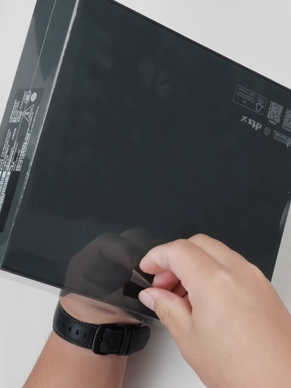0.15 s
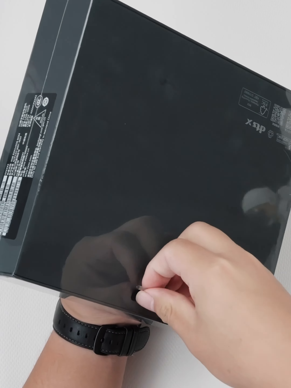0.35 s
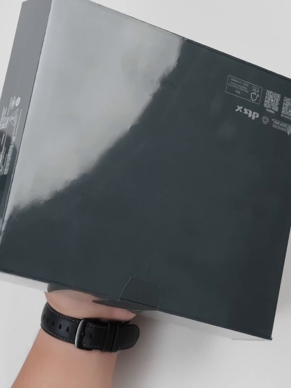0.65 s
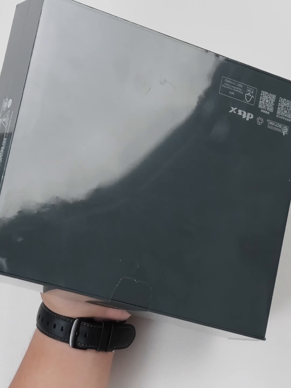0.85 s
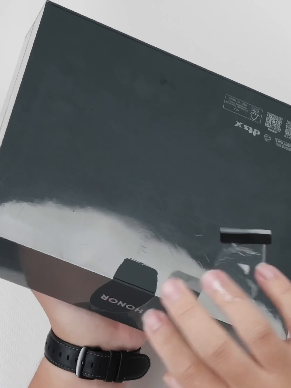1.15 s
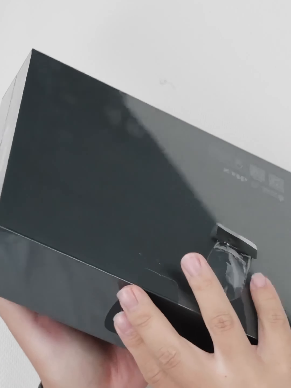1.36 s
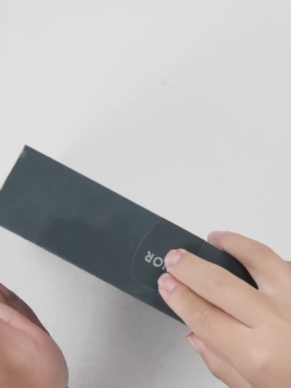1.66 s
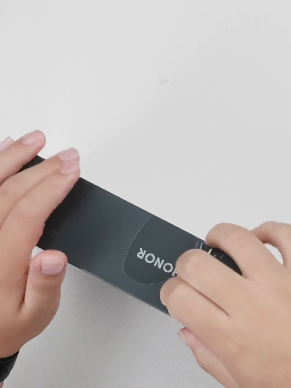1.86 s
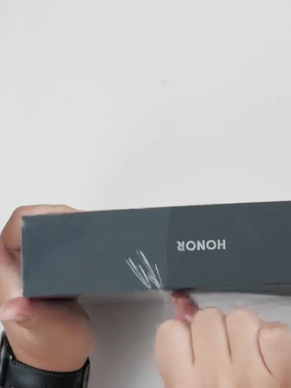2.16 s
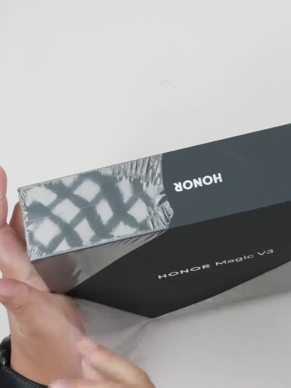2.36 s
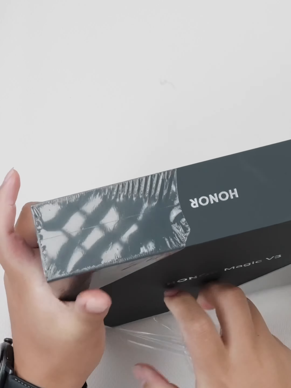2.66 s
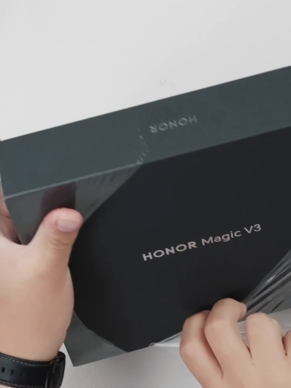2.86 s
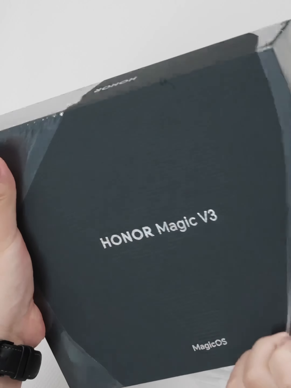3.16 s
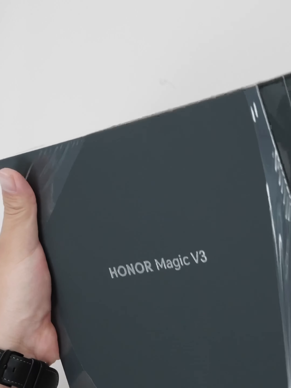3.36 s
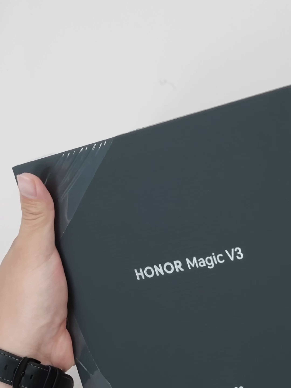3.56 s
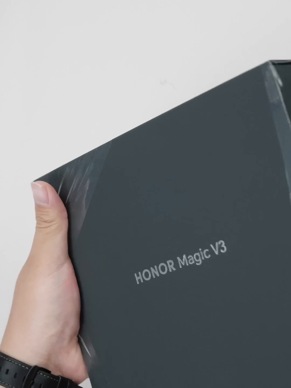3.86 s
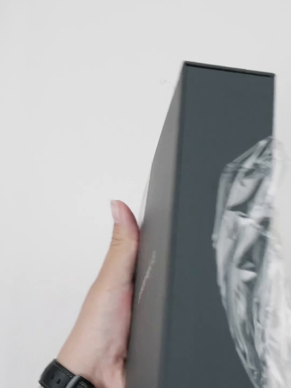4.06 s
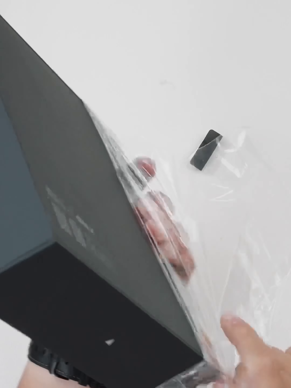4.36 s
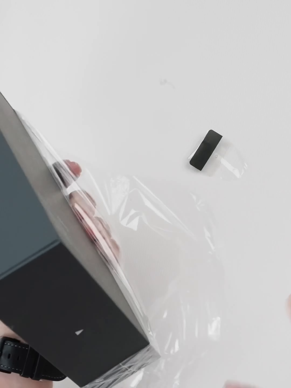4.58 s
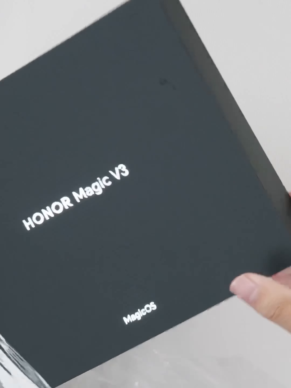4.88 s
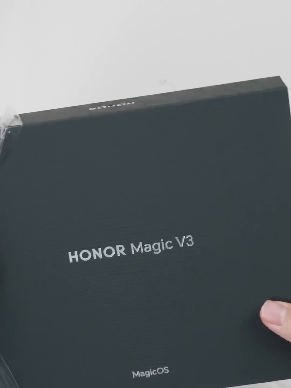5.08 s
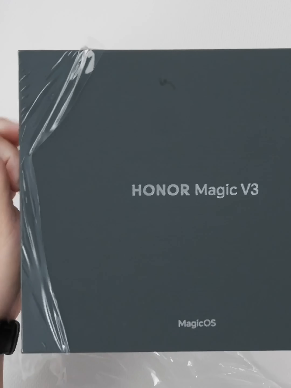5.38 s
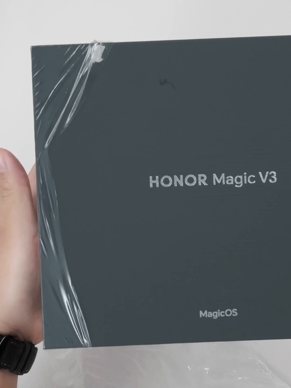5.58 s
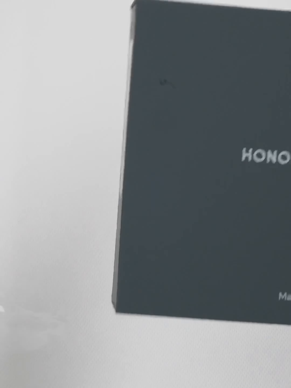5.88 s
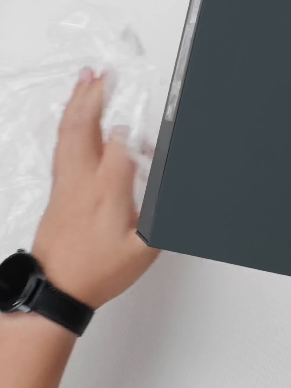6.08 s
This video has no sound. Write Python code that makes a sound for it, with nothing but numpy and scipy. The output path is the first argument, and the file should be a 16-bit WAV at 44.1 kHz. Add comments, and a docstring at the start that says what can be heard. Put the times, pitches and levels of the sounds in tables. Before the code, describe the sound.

Close to one microphone in a small bare room, hands strip crisp wrapping from a card box. After faint ticks the taut film cracks loudly. Box thuds and gliding scrapes lead into a low, buzzy rip, followed by loose crinkling, light knocks and soft squeaks. A bright cluster of snaps comes later, then gathered film rustles, fingers tap dully, and another strong snap fades into rustle over faint room noise.

```python
"""A small bare room: shrink film is torn off a stiff cardboard box over a table, close to one microphone.
The taut film bursts in sharp snaps and short rips: shaped noise bursts and slips that ring resonances.
It crinkles as it is gathered (pitched grains over hiss) and scrapes along the card (gliding resonances).
The box lands with thuds, fingers knock and film squeaks softly on it (damped modes) and its lid hums,
over reflections and low room noise."""
import sys
import numpy as np
from scipy import signal
from scipy.fft import rfft, irfft
from scipy.io import wavfile

SR = 44100
rng = np.random.default_rng(int(sys.argv[2]) if len(sys.argv) > 2 else 0)


def log_audio(samples):
    """Write samples as a 16-bit WAV file to the path given in sys.argv[1]."""
    # one column per channel
    frames = np.atleast_2d(samples).T
    # limit to full scale, then quantise
    limited = np.clip(frames, -1, 1)
    pcm = np.round(limited * 32767).astype(np.int16)
    wavfile.write(sys.argv[1], SR, pcm)


N = 274804
TIME = np.arange(N) / SR  # s

# the taut film snaps; a smaller freed patch rings higher; the two dull rows at 5.585 and 5.638 s
# are the contact clicks of finger knocks:
# [t/s, strength level/dB, patch f/Hz, box body below 900 Hz level/dB]
SNAPS_AND_CLICKS = [(0.1443, -20.5, 7100, 9.5), (0.28, -35, 8870, 18), (0.5457, -10, 4690, -10),
                    (0.556, -2, 5440, -5), (0.5568, -6.5, 7000, 1), (0.589, 11, 4700, 4.5),
                    (0.6, -22, 3000, 15), (0.61, -10, 8000, -9), (1.0326, -20.5, 5660, -10),
                    (1.8292, -15, 5970, 10.5), (1.8992, -6, 15000, 8), (2.121, -15.5, 2600, 5),
                    (2.2277, -4, 5200, 0), (2.351, -21, 5480, 1), (2.3624, -14, 3580, 9),
                    (2.3988, -1, 3030, 1.5), (2.506, -39, 2480, 3), (2.6856, -24.5, 8900, 5),
                    (2.697, -21.5, 4160, 8), (2.7177, -26, 6550, 15), (2.7493, -35, 5500, -1),
                    (2.9379, -6, 6260, 11.5), (3.001, -21.5, 4500, 17), (3.0298, -13, 2170, 1),
                    (3.106, -31, 1900, 0), (3.202, -20, 3600, -8), (3.269, -26, 5030, 7),
                    (3.3478, -26, 11300, 8), (3.447, -13.5, 4220, 12), (3.4964, -25, 5600, 3),
                    (3.547, -22.5, 6900, 13.5), (3.6484, -19, 3500, -7), (3.7215, 2, 2170, -3.5),
                    (3.8492, -13.5, 2000, 1), (3.921, -21, 4200, 1), (3.9831, -10.5, 10700, -4),
                    (4.021, -14, 4600, -29), (4.032, -4, 4020, -5), (4.036, 2.5, 13800, -3),
                    (4.0545, 3, 11000, -13), (4.059, 6, 12500, 4), (4.0786, -1, 13400, -3),
                    (4.084, -3.5, 13500, 10), (4.2858, -24, 5000, 7), (4.3712, -19, 7000, 6),
                    (4.386, -7, 5130, -11), (4.9837, -26, 13000, 12), (5.168, -24.5, 4300, -5),
                    (5.203, -22.5, 7040, -24), (5.254, -25, 5400, 11), (5.337, -25, 2520, 10),
                    (5.3444, -13, 2200, 6.5), (5.495, -21, 3820, 6), (5.528, -13.5, 3300, 5.5),
                    (5.534, -16.5, 4600, 5), (5.585, -15.5, 1300, 14), (5.638, -26, 1400, 7),
                    (5.724, -7.5, 5900, 11.5), (5.7273, -4.5, 6400, 5), (5.7363, 11, 2280, -2),
                    (5.748, -1, 3020, 5), (5.762, -9, 6000, 0), (5.863, -15, 6100, -28),
                    (6.0565, -20, 4400, -18), (6.1163, -22, 2730, -21)]
# colour that all snaps and clicks share: [f/Hz, level/dB]
SNAP_SPECTRUM = [(100, -24), (450, -1.5), (900, -3.5), (1800, -0.57), (3000, -3), (5000, -4), (7000, -3),
                 (10500, -2.8), (16000, -2)]
CRACK_S, FLUTTER_S = .0007, .005  # decay times


def snaps(release_db=3, flutter_db=-14, steepness=2.47, ring_db=5, ring_octaves=1.0, level_db=0):
    """Each snap is a sudden release of tension, a short crack and a flutter of film; two are knock clicks."""
    out, t = np.zeros(N), np.arange(2048) / SR
    hz = np.geomspace(100, 16000, 40)
    low = np.interp(hz, [900, 1800], [1, 0])
    for s, db, patch_hz, body_db in SNAPS_AND_CLICKS:
        dying = np.exp(-t / CRACK_S) + amp(flutter_db) * np.exp(-t / FLUTTER_S)
        # the stronger the snap, the more a clean pulse leads it
        pulse = amp(release_db + db) * (t == 0)
        burst = rng.standard_normal(len(t)) * dying - pulse
        # the patch rings broadly at its pitch and radiates less above it
        patch = ring_db * np.exp(-(np.log2(hz / patch_hz) / ring_octaves) ** 2)
        patch -= 10 * np.log10(1 + (hz / patch_hz) ** steepness)
        shape = read(SNAP_SPECTRUM, hz) + body_db * low + patch
        snap = colour(disperse(burst), np.column_stack([hz, shape]))
        add(out, s, amp(db + level_db) * snap)
    return out


# the film tears in short runs: [t/s, length t/s, box panel level/dB, panel f/Hz,
# taut film level/dB, film f/Hz, torn edge level/dB]
TEARS = [(0.553, 0.0056, -44, 880, -38, 1910, -34.5), (0.566, 0.013, -39, 774, -46, 1820, -55),
         (0.588, 0.033, -51, 520, -52, 1500, -38.5), (2.134, 0.0087, -42, 553, -48, 1670, -63),
         (2.1515, 0.026, -34.5, 513, -42, 1780, -68), (2.192, 0.024, -35.5, 510, -43, 1580, -74),
         (2.219, 0.019, -31.5, 610, -40.5, 1500, -65), (3.72, 0.0046, -45, 980, -59, 1740, -43),
         (5.724, 0.0021, -42, 660, -44, 1560, -46), (5.725, 0.0058, -36, 706, -54, 1850, -40),
         (5.731, 0.019, -50, 580, -58, 1800, -46)]
# resonances of the taut film: [multiple of its pitch, width f/Hz, level/dB]
TAUT_MODES = [(.66, 500, 1.5), (1, 383, 9.5), (1.36, 528, 6.5), (1.999, 600, -6), (2.7, 676, -17.5)]


def rips(slips_per_s=420, uneven=.45, spread_db=3.5, release_s=0.0097, panel_width_hz=300,
         edge_hz=7500, edge_width_hz=900, fold_hz=4750, fold_db=-7, tighten_octaves_per_s=0.91, count=120):
    """A tear runs in quick uneven slips; each rings the box panel, the taut film and its thin torn edge."""
    out, t = np.zeros(N), np.arange(4096) / SR
    tension = 2 ** (tighten_octaves_per_s * t)  # bends every pitch upwards
    for s, length_s, panel_db, panel_hz, film_db, film_hz, edge_db in TEARS:
        gaps, sizes = rng.standard_normal((2, count))
        at = np.cumsum(np.exp(uneven * gaps)) / slips_per_s
        strengths = amp(spread_db * sizes) * rng.choice([-1, 1], count)
        slips = np.zeros(len(t))
        for slip_s, strength in zip(at - at[0], strengths):
            add(slips, slip_s, [strength])
        slips *= np.exp(-np.maximum(t - length_s, 0) / release_s)
        panel = resonate(slips, panel_hz * tension, panel_width_hz)
        film = sum(amp(db) * resonate(slips, film_hz * ratio * tension, width)
                   for ratio, width, db in TAUT_MODES)
        edge = resonate(slips, edge_hz * tension, edge_width_hz)
        edge += amp(fold_db) * resonate(slips, fold_hz * tension, edge_width_hz / 2)
        tear = amp(panel_db) * unit(panel) + amp(film_db) * unit(film) + amp(edge_db) * unit(edge)
        # a shorter tear carries less energy
        add(out, s, np.sqrt(length_s / t[-1]) * tear)
    return out


# colour of the crinkling film: [f/Hz, level/dB]
CRINKLE_SPECTRUM = [(150, -12.5), (400, 4.5), (900, 2.5), (1800, 5.5), (3200, 2), (5000, -1), (8000, -1.5),
                    (11000, -6.5), (16000, -9.5)]
CREASES_PER_S, CREASE_SPREAD_DB = 2200, 3  # tiny creases that flip, and the spread of their sizes


def crinkle(cycles=0.94, level_db=-1, top_hz=9500, count=24):
    """Many tiny creases flip in clumps, each with its own pitch, over the soft hiss of film on film."""
    grains, t = np.zeros(N), np.arange(256) / SR
    for hz in np.linspace(600, 15500, count):
        flips = rng.random(N) < CREASES_PER_S / count / SR
        size = amp(CREASE_SPREAD_DB * np.minimum(rng.exponential(1, N), 4)) * flips
        crease = np.exp(-t * np.sqrt(hz * 4000) / cycles) * np.sin(2 * np.pi * hz * t)
        crease /= np.linalg.norm(crease)
        grains += signal.oaconvolve(size * rng.choice([-1, 1], N), crease)[:N]
    clumps = unit(grains) * catching(rate_hz=110, depth_db=3)
    crackle = unit(unit(colour(clumps, CRINKLE_SPECTRUM)) + ticks())
    hiss = unit(colour(rng.standard_normal(N), CRINKLE_SPECTRUM))
    # the treble follows the hand with its own crispness
    treble = 1 / (1 + (top_hz / (np.fft.rfftfreq(N, 1 / SR) + 1)) ** 8)
    out = np.zeros(N)
    for sound, crackling in (crackle, True), (hiss, False):
        top = irfft(rfft(sound) * treble, N)
        out += (sound - top) * handling(False, crackling) + top * handling(True, crackling)
    return amp(level_db) * out


def ticks(per_s=100, spread_db=4, tick_s=0.0018, level_db=-6.5, count=6):
    """Larger folds flip with ticks of their own, each size of fold in its own register."""
    out = np.zeros(N)
    for hz in np.geomspace(1500, 12000, count):
        size = amp(spread_db * np.minimum(rng.exponential(1, N), 2))
        flips = size * (rng.random(N) < per_s / count / SR)
        dying = signal.lfilter([1], [1, -np.exp(-1 / (tick_s * SR))], flips)
        out += resonate(dying * rng.standard_normal(N), np.full(N, hz), hz)
    return amp(level_db) * unit(colour(out, CRINKLE_SPECTRUM))


def catching(rate_hz, depth_db):
    """Film catches and lets go unevenly: a random gain of rms 1."""
    wander = unit(lowpass(rng.standard_normal(N), rate_hz))
    return unit(amp(depth_db * np.clip(wander, -2, 2)))


# the hand pulls or gathers the film, which crinkles and settles: [tightest t/s, level/dB, rise t/s,
# fall t/s, crispness of the treble level/dB, crackle over hiss level/dB]
HAND_PULLS = [(0, -60.5, 0.0092, 0.13, 4, -12), (.585, -41, 0.044, 0.2, 1, -5),
              (1.021, -66, 0.15, 0.098, -1, -1), (1.351, -65, 0.069, 0.17, -7, 2),
              (1.7, -59.5, 0.1, 0.87, -11, 3.5), (2.26, -45.5, 0.11, 0.48, -3, 10),
              (2.38, -46, 0.066, 0.042, 2, 6), (2.57, -55.5, 0.042, 0.16, 8, 4),
              (2.76, -72, 0.075, 0.19, -7, 23), (3.022, -50.5, 0.053, 0.089, 5.5, 12),
              (3.2, -52, 0.089, 0.12, 2, 4), (4.07, -41.5, 0.058, 0.18, -3, 0),
              (4.311, -46.5, 0.13, 0.23, 2.5, 9), (4.385, -40.5, 0.042, 0.1, 4.5, 1.5),
              (4.5, -50.5, 0.12, 0.13, 3, -1), (4.88, -54.5, 0.14, 0.27, -3, -4),
              (5.22, -54, 0.025, 0.18, 4, 12), (5.335, -51.5, 0.027, .04, 1, 2),
              (5.73, -46.5, 0.096, 0.19, 3, 6), (5.86, -51.5, 0.055, 0.25, 1, -11)]
# the film rustles by itself once it hangs loose: [t/s, level/dB]
LOOSE_RUSTLE = [(0, -78), (2.08, -80), (2.2, -60.5), (3.33, -63.5), (3.55, -58), (4.5, -60.5), (5.42, -62),
                (5.55, -55), (6.23, -64)]


def handling(crisp, crackling, loose_crackle_db=5):
    """Level curve of the pulls over the loose rustle, for treble or the rest, for crackle or hiss."""
    def share(crackle_db):
        """Decibels of the whole that go to the crackle, or else to the hiss."""
        return -10 * np.log10(1 + amp(-crackle_db if crackling else crackle_db) ** 2)
    pulls = [(s, db + crisp * crisp_db + share(crackle_db), rise_s, fall_s)
             for s, db, rise_s, fall_s, crisp_db, crackle_db in HAND_PULLS]
    loose_db = np.interp(TIME, *np.transpose(LOOSE_RUSTLE)) + share(loose_crackle_db)
    return np.hypot(swells(pulls), amp(loose_db))


# film or skin slides along the card:
# [fastest t/s, level/dB, rise t/s, fall t/s, pitch f/Hz, glide in octaves per s]
CARD_SLIDES = [(.58, -39.5, 0.019, 0.14, 1300, -6), (1.33, -59.5, 0.096, 0.1, 390, 5),
               (1.67, -51, 0.047, 0.13, 259, 2), (1.72, -54.5, 0.068, 0.34, 1800, 2.5),
               (1.876, -54, 0.086, 0.17, 2560, 1.5), (2.166, -43, 0.023, .12, 1500, -8),
               (2.2, -36.5, 0.056, .05, 335, -7), (2.25, -42.5, 0.05, 0.37, 606, 0.57),
               (2.56, -59, 0.036, 0.14, 560, 9), (2.859, -57, 0.086, 0.099, 1500, 4),
               (3.13, -45.5, 0.023, 0.074, 1530, 6), (3.16, -48.5, 0.035, 0.02, 2790, 9),
               (4.1, -45, .05, 0.058, 263, 1), (5.02, -48.5, 0.061, 0.11, 970, -10),
               (5.028, -57, 0.12, 0.14, 2070, -3.5), (5.067, -50, 0.027, 0.033, 1410, 8),
               (5.08, -49, 0.023, 0.012, 2800, 2), (5.206, -50, 0.011, 0.1, 1970, -4),
               (5.26, -51.5, 0.049, 0.082, 370, 4), (5.71, -51, 0.094, 0.059, 636, -5)]
# resonances of the sliding sheet: [multiple of its pitch, width as a share of the pitch, level/dB]
SHEET_MODES = [(0.581, 0.3, -2), (1.001, 0.71, 18.5), (1.7, .8, 1), (2.8, 0.75, -4.5), (4.3, 0.99, -18.5)]


def slides(slips_per_s=700, hiss=0.13, grit_db=-5, grit_db_per_octave=4, grit_hz=1000, grit_reach=1.41):
    """Uneven slips ring the sheet, whose pitch glides as it tightens or slackens; high rubs are grittier."""
    out = np.zeros(N)
    for peak_s, db, rise_s, fall_s, pitch_hz, glide in CARD_SLIDES:
        t = np.arange(peak_s - 2 * rise_s, peak_s + 2 * fall_s, 1 / SR)
        noise = rng.standard_normal(N)[:len(t)]
        slips = noise * (hiss + (rng.random(N)[:len(t)] < slips_per_s / SR))
        hz = pitch_hz * 2 ** np.clip(glide * (t - peak_s), -1, 1)
        sheet = sum(amp(mode_db) * resonate(slips, hz * ratio, pitch_hz * width)
                    for ratio, width, mode_db in SHEET_MODES)
        dull_hz = grit_reach * pitch_hz
        grit = unit(lowpass(lowpass(slips, dull_hz), dull_hz))
        grit = amp(grit_db + grit_db_per_octave * np.log2(pitch_hz / grit_hz)) * grit
        add(out, t[0], unit(unit(sheet) + grit) * swell(t, peak_s, db, rise_s, fall_s))
    return out


# the loosened sleeve of film slips along the box: [fastest t/s, level/dB, rise t/s, fall t/s]
SLEEVE_SLIPS = [(3.8, -70, 0.31, .3), (4.87, -66, 0.43, 0.61), (5.65, -61, 0.16, .7)]


def sleeve(hz=8200, width_hz=3200):
    """Smooth film slips over the smooth card with a thin, even hiss."""
    return unit(resonate(rng.standard_normal(N), np.full(N, hz), width_hz)) * swells(SLEEVE_SLIPS)


# the whole box bumps the table and chatters to rest: [t/s, strength level/dB, dull above f/Hz]
TABLE_BUMPS = [(0.593, -22.5, 164), (1.7553, -8.5, 1020), (1.7654, -22.5, 900), (1.7872, -34, 700),
               (1.797, -29, 300), (1.8105, -23.5, 420), (1.8243, -30, 500), (2.2604, -11, 173),
               (2.269, -23, 200), (2.377, -20.5, 174), (4.06, -30, 200), (4.825, -28.5, 142)]
# modes of the box on the table: [f/Hz, level/dB, time to fall 60 dB t/s]
BOX_MODES = [(148, -23.5, 0.15), (185, -7, 0.022), (241, -21.5, 0.049), (312.6, -3, 0.051), (484, -21, 0.1),
             (599, -30, 0.25), (680, -9, 0.039), (1133, -22, 0.031)]


def thuds(push_s=0.0002, push_db=0, rattle_db=-20, rattle_t60=0.53, rattle_hz=800, lowest_hz=115, sub_db=-13):
    """A heavy push rings box and table; the table top rattles on briefly."""
    out, t = np.zeros(N), np.arange(SR) / SR
    modes = sum(amp(db - 60 * t / t60) * np.sin(2 * np.pi * hz * t) for hz, db, t60 in BOX_MODES)
    push = amp(push_db) * (t / push_s) * np.exp(1 - t / push_s)
    # a small box radiates little bass
    small_box = [(30, sub_db), (lowest_hz / 2, sub_db), (lowest_hz * 1.8, 0), (16000, 0)]
    for s, db, dull_hz in TABLE_BUMPS:
        rattle = unit(lowpass(rng.standard_normal(len(t)), rattle_hz))
        rattle = rattle * amp(rattle_db - 60 * t / rattle_t60)
        radiated = colour(modes + push + rattle, small_box)
        add(out, s, amp(db) * lowpass(radiated, dull_hz))
    return out


# fingers knock on the box and film squeaks softly against it (near 3.65 and 3.81 s):
# [t/s, level/dB, panel or squeak f/Hz, hardness of the contact level/dB]
KNOCKS_AND_SQUEAKS = [(2.091, -47.5, 1620, 4), (2.2005, -32, 1210, -14), (2.23, -27.5, 660, -8),
                      (2.938, -30, 680, -13), (3.106, -38.5, 314, 2), (3.4436, -29.5, 490, -14.5),
                      (3.646, -22.5, 465, -19.5), (3.8057, -23, 538, -19), (3.847, -32, 500, -10),
                      (4.823, -31, 320, -2), (4.836, -46, 736, 6), (5.254, -40, 363, -3),
                      (5.293, -44.5, 520, 6.5), (5.345, -34, 222, 0.5), (5.394, -28, 350, -14),
                      (5.443, -43.5, 1330, 1), (5.583, -26, 223, -3.5), (5.594, -33.5, 384, 2),
                      (5.638, -30.5, 224, -3), (5.7344, -17.5, 635, -10.5)]
# colour of a fingertip tapping card: [f/Hz, level/dB]
TAP_SPECTRUM = [(60, -18), (180, 8), (500, 4), (800, -2.5), (1500, -1), (2400, -15), (5000, -19),
                (16000, -39)]


def knocks(ring_s=0.0043, press_s=0.00036, overtone=2.47, overtone_db=-8, rim_hz=720, rim_db=-9,
           tap_db=25, tap_s=0.0022, top_hz=2600, lowest_hz=130):
    """A damped panel and the stiff rim ring for a few cycles with the tap; soft onsets make film squeaks."""
    out, t = np.zeros(N), np.arange(4096) / SR
    for s, db, hz, hard_db in KNOCKS_AND_SQUEAKS:
        modes = [(hz, 1), (hz * overtone, amp(overtone_db)), (rim_hz, amp(rim_db))]
        panel = sum(gain * np.exp(-t / ring_s * np.sqrt(f / hz)) * np.sin(2 * np.pi * f * t)
                    for f, gain in modes)
        # a soft contact presses in more slowly
        panel = panel * (1 - np.exp(-t * amp(hard_db) / press_s))
        burst = rng.standard_normal(len(t)) * np.exp(-t / tap_s)
        tap = colour(disperse(burst), TAP_SPECTRUM)
        add(out, s, amp(db) * (panel + amp(tap_db + hard_db) * tap))
    return signal.lfilter(*signal.butter(2, [lowest_hz, top_hz], "band", fs=SR), out)


# the broad lid is flexed and hums:
# [loudest t/s, level/dB, rise t/s, fall t/s, rumble beside the hum level/dB]
LID_FLEXES = [(1.841, -45, 0.05, 0.35, -5), (2.32, -38.5, 0.047, 0.28, -4), (5.94, -57.5, 0.28, 0.47, -23)]


def lid(hz=149, rumble_hz=155, width_hz=110):
    """The lowest mode of the lid hums; when the box is jostled, a loose rumble surrounds it."""
    hum = unit(np.sin(2 * np.pi * hz * TIME)) * swells([row[:-1] for row in LID_FLEXES])
    rumble = unit(resonate(rng.standard_normal(N), np.full(N, rumble_hz), width_hz))
    rumble_rows = [(s, db + rumble_db, rise_s, fall_s) for s, db, rise_s, fall_s, rumble_db in LID_FLEXES]
    return hum + rumble * swells(rumble_rows)


# the box is swung round in the hands: [fastest t/s, level/dB, rise t/s, fall t/s]
BOX_SWINGS = [(.72, -56, 0.12, .45), (1.81, -50.5, 0.06, 0.39), (2.62, -59.5, 0.3, 1.6)]


def sway(top_hz=60, lowest_hz=22):
    """The broad box pushes air at the microphone: a faint rumble."""
    rumble = signal.lfilter(*signal.butter(2, [lowest_hz, top_hz], "band", fs=SR), rng.standard_normal(N))
    return unit(rumble) * swells(BOX_SWINGS)


# a faint high ring dies away at the start: [f/Hz, starting rms level/dB, time to fall 60 dB t/s]
HIGH_RING = [(5100, -68, 1), (5900, -61, 0.18), (6900, -64.5, 0.75), (8360, -78, 0.53), (11060, -64, 0.36)]


def ring(width_hz=750):
    """Narrow bands of treble noise fade out."""
    t = np.arange(SR) / SR
    out = np.zeros(N)
    for hz, db, t60 in HIGH_RING:
        band = unit(resonate(rng.standard_normal(SR), np.full(SR, hz), width_hz))
        add(out, 0, band * amp(db - 60 * t / t60))
    return out


# standing waves of the room: [f/Hz, level/dB, time to fall 60 dB t/s]
STANDING_WAVES = [(156, -70.5, 0.41), (257, -70.5, .8), (317, -61, 0.25), (600, -56.5, 0.24)]
MOVE_S = .09  # time from one set of reflections to the next


def room(x, wet_db, early_db, count=5):
    """Sets of reflections crossfade in a cycle, as for a box that keeps moving; the standing waves stay."""
    t = np.arange(SR) / SR
    standing = sum(amp(db - 60 * t / t60) * np.cos(2 * np.pi * f * t) for f, db, t60 in STANDING_WAVES)
    out = x + signal.fftconvolve(x, standing)[:N]
    for k in range(count):
        # each position swells and fades over two moves, then waits its turn
        near = np.sin(np.pi / 2 * np.minimum((TIME / MOVE_S - k) % count, 2))
        out += signal.fftconvolve(x * near, reflections(wet_db, early_db))[:N]
    return out


# decay of the room: [f/Hz, time to fall 60 dB t/s]
TAIL_T60 = [(100, 1), (300, 0.42), (1000, 0.5), (3000, 0.5), (8500, 0.42), (11000, 0.27), (16000, 0.33)]
# colour of the room's tail: [f/Hz, level/dB]
TAIL_SPECTRUM = [(100, -6), (180, 3.5), (320, 9), (600, -2.5), (1000, 1.5), (3000, -0.5), (5000, 2),
                 (8200, 2.5), (11000, 3.5), (16000, -12)]


def reflections(wet_db, early_db, early_s=0.0044, build_s=0.0021):
    """Quick reflections from table and box, then the tail of the bare walls, for one position of the box."""
    t = np.arange(SR) / SR
    taps = rng.standard_normal(SR) * (rng.random(SR) < 6000 / SR)
    hz, frame_s, z = signal.stft(taps, SR, nperseg=256)
    z = z * amp(read(TAIL_SPECTRUM, hz)[:, None] - 60 * frame_s / read(TAIL_T60, hz)[:, None])
    tail = signal.istft(z, SR, nperseg=256)[1][:SR] * (1 - np.exp(-t / build_s))
    early = rng.standard_normal(SR) * (rng.random(SR) < 5000 / SR)
    early = early * np.exp(-t / early_s) * (t > .001)
    return amp(wet_db) * tail / np.linalg.norm(tail) + amp(early_db) * disperse(early)


# still air of the room: [f/Hz, relative level/dB]
AIR_SPECTRUM = [(20, 1.5), (35, 0.5), (60, -2), (130, -3.5), (250, -2), (450, -7), (650, -10), (1100, -10),
                (1800, -20.5), (4000, -32.5), (9000, -39), (16000, -43)]


def air(level_db=-60):
    """Steady low room noise: white noise shaped to the spectrum of the still air."""
    gain = amp(read(AIR_SPECTRUM, np.fft.rfftfreq(N, 1 / SR)))
    return amp(level_db) * unit(irfft(rfft(rng.standard_normal(N)) * gain, N))


def swell(t, peak_s, db, rise_s, fall_s):
    """One movement of the hand: it gathers 20 dB over its rise and loses 20 dB over each fall time."""
    before, after = np.maximum(peak_s - t, 0), np.maximum(t - peak_s, 0)
    return amp(db - 20 * np.minimum((before / rise_s) ** 2 + after / fall_s, 10))


def swells(rows):
    """The joint level of several movements, summed as power."""
    return np.sqrt(sum(swell(TIME, *row) ** 2 for row in rows))


def disperse(x, evenness=0.65):
    """Keeps the rough timing of a burst but evens its spectrum; energy 1."""
    z = rfft(x, 2 * len(x))
    even = irfft(z / (abs(z) + 1e-12) ** min(evenness, 1))[:len(x)]
    return even / np.linalg.norm(even)


def resonate(x, hz, width_hz):
    """A resonance that follows the curve hz: shift down to 0 Hz, smooth, shift back up."""
    turn = np.exp(2j * np.pi * np.cumsum(hz) / SR)
    r = np.exp(-np.pi * width_hz / SR)
    return 2 * (turn * signal.lfilter([(1 - r) ** 2], [1, -2 * r, r * r], x / turn)).real


def colour(x, points, size=2048):
    """Causal minimum-phase filter with the given spectrum, so that attacks stay sharp."""
    log_gain = np.log(amp(read(points, abs(np.fft.fftfreq(size, 1 / SR)))))
    taps = np.fft.ifft(np.exp(np.conj(signal.hilbert(log_gain)))).real
    return signal.oaconvolve(x, taps)[:len(x)]


def lowpass(x, hz):
    """Second-order low-pass."""
    return signal.lfilter(*signal.butter(2, min(hz, SR / 3), fs=SR), x)


def read(points, hz):
    """Reads a spectrum on a log-frequency axis."""
    f, value = np.transpose(points)
    return np.interp(np.log(hz + 1), np.log(f + 1), value)


def amp(db):
    """Decibels to gain."""
    return 10 ** (np.asarray(db) / 20)


def unit(x):
    """Scales to rms 1."""
    return x / np.sqrt(np.mean(x ** 2) + 1e-20)


def add(mix, s, sound):
    """Mixes a sound in at time s."""
    part = mix[max(round(s * SR), 0):][:len(sound)]
    part += sound[:len(part)]


def scene():
    """Film and box sound in the same room; the box, close to the microphone, is drier."""
    film = room(snaps() + rips() + crinkle(), wet_db=-9.5, early_db=-6.0)
    box = room(knocks() + thuds() + slides(), wet_db=-10.5, early_db=-10.0)
    return (film + box + sleeve() + lid() + ring() + sway() + air())[None]


def record(dry, edge_hz=16200):
    """The recorder clips peaks hard, then cuts the treble above its band edge."""
    clipped = np.clip(dry, -.88, .88)
    band = signal.firwin(255, edge_hz, window=("kaiser", 8), fs=SR)
    return signal.oaconvolve(clipped, band[None], "same")


dry = scene()
out = record(dry)
log_audio(out)
```